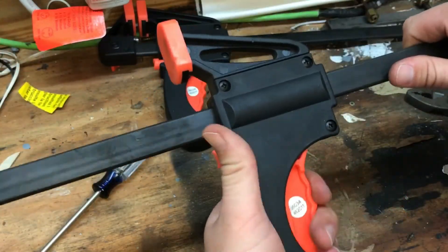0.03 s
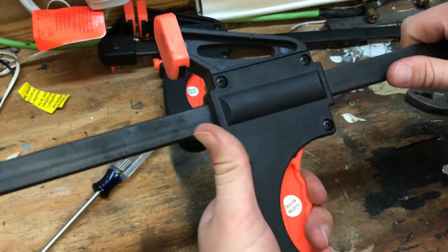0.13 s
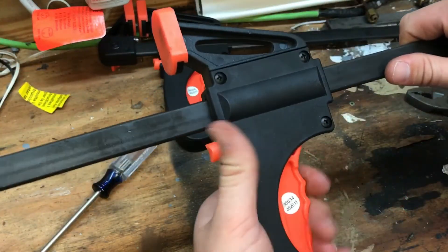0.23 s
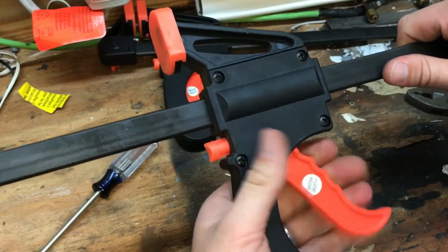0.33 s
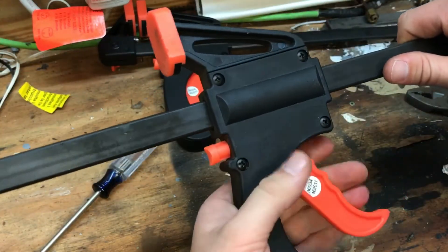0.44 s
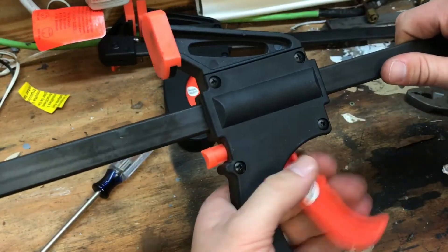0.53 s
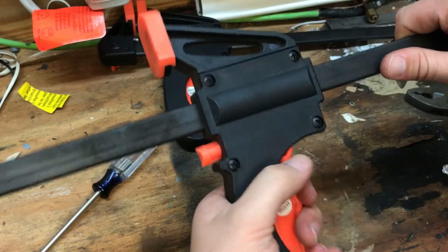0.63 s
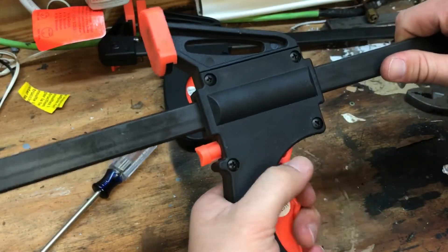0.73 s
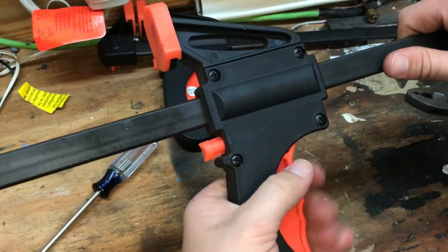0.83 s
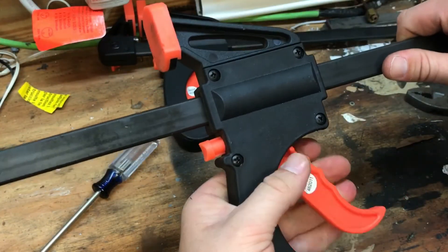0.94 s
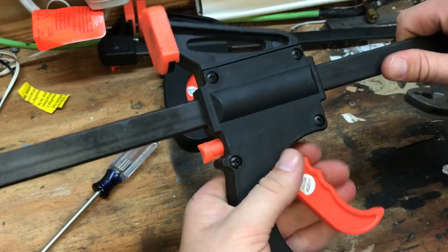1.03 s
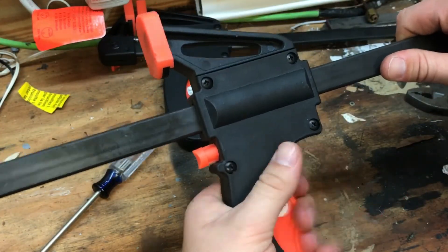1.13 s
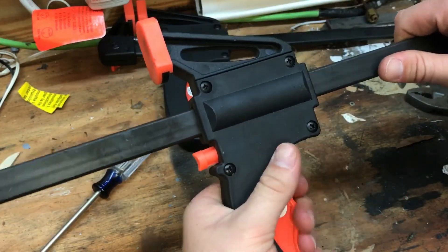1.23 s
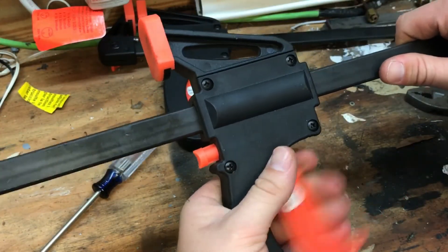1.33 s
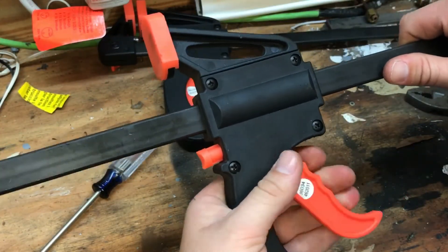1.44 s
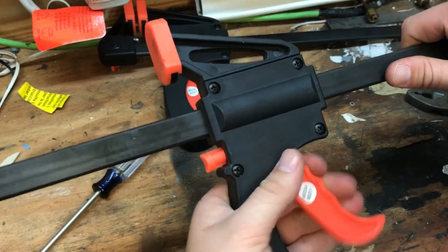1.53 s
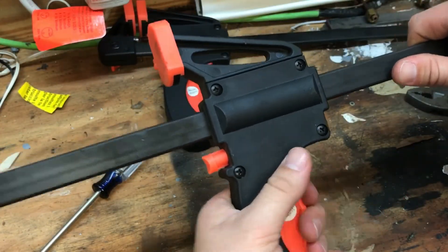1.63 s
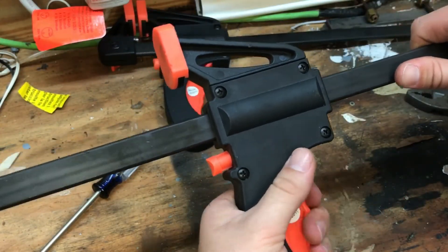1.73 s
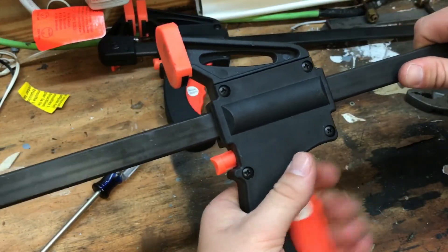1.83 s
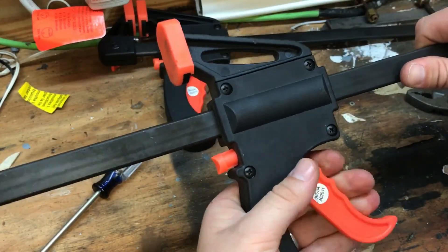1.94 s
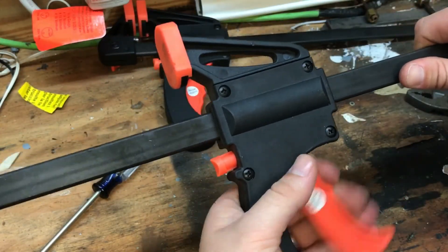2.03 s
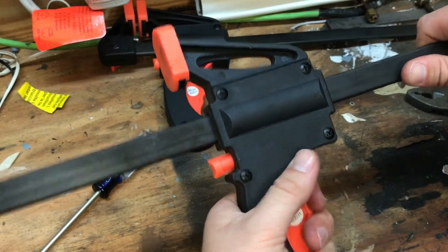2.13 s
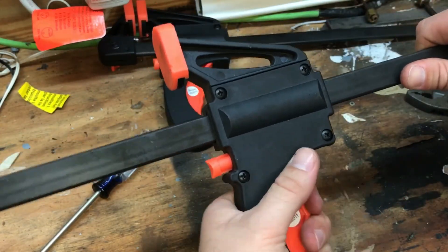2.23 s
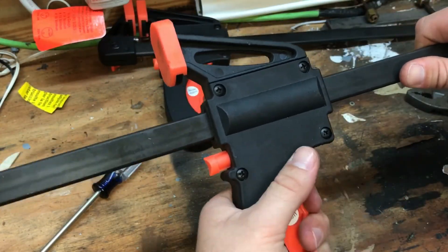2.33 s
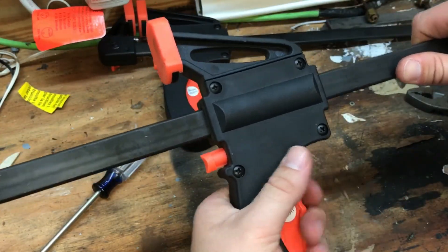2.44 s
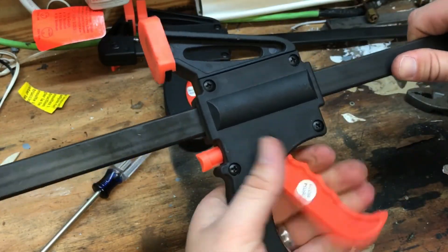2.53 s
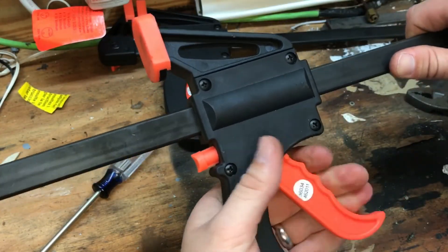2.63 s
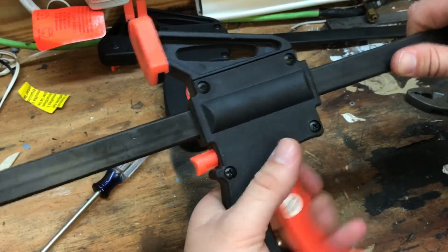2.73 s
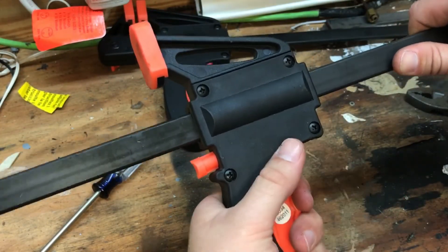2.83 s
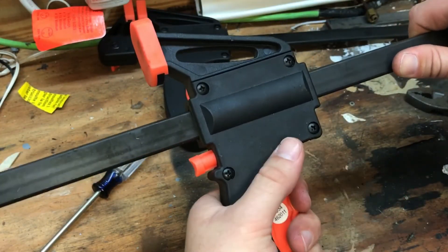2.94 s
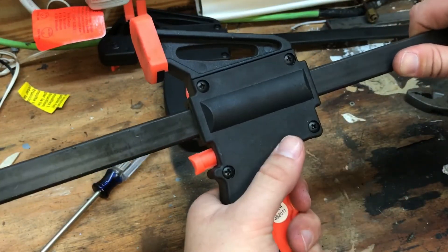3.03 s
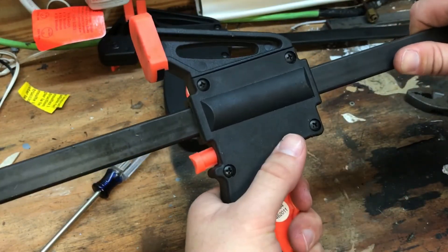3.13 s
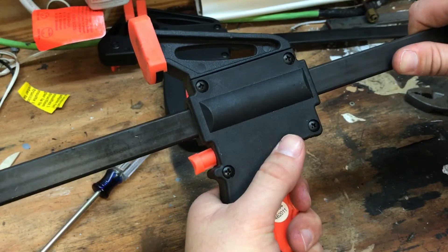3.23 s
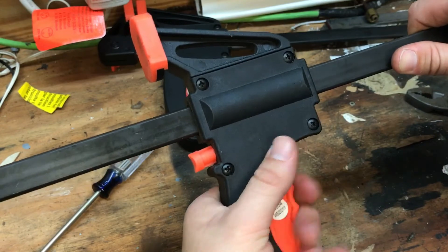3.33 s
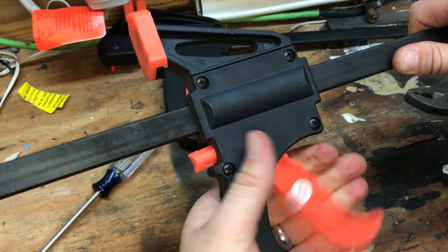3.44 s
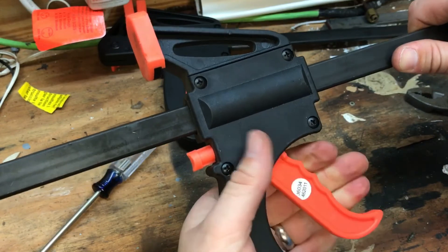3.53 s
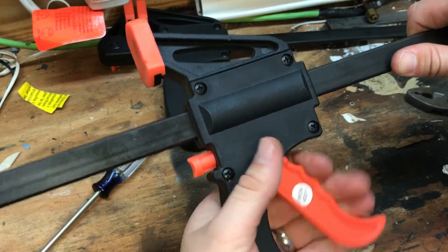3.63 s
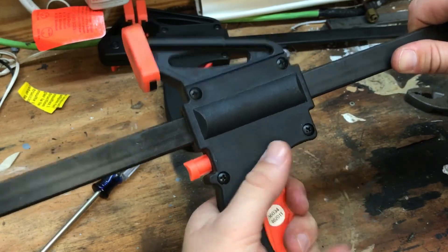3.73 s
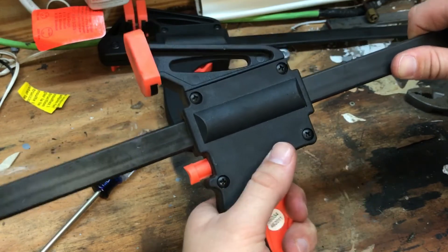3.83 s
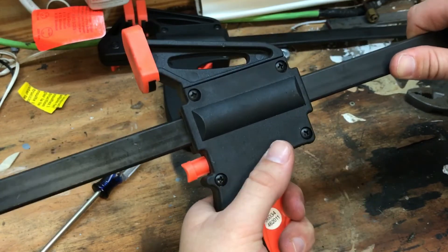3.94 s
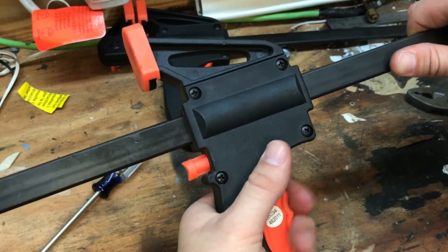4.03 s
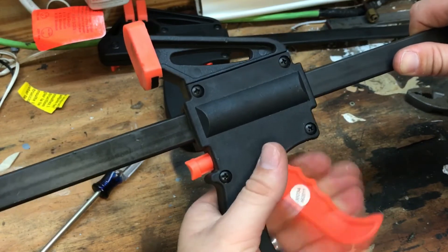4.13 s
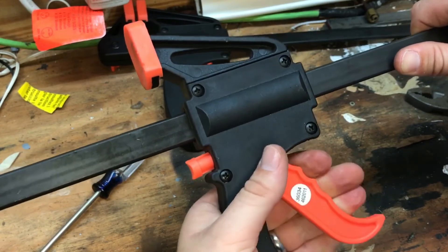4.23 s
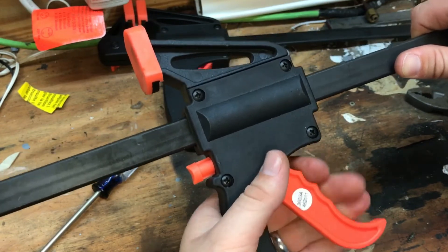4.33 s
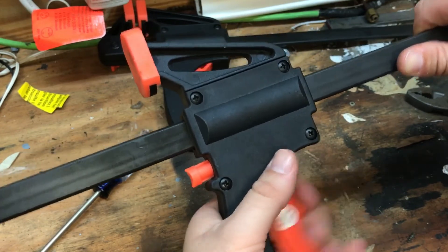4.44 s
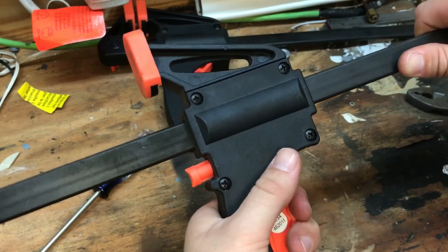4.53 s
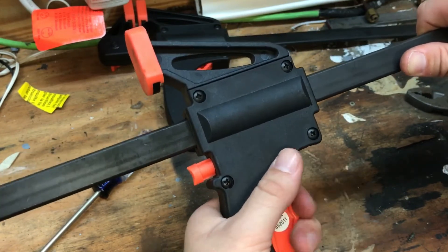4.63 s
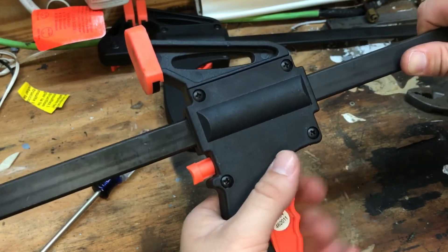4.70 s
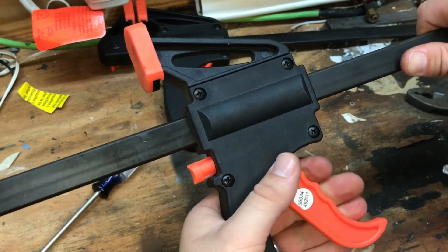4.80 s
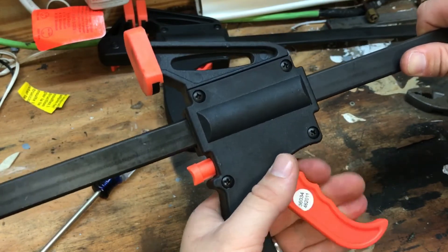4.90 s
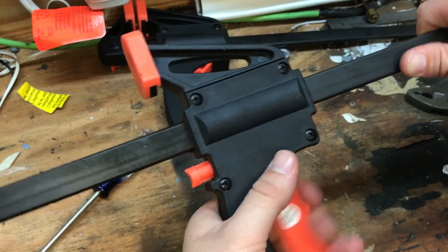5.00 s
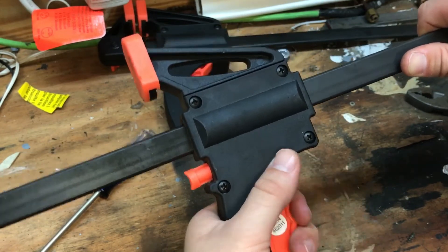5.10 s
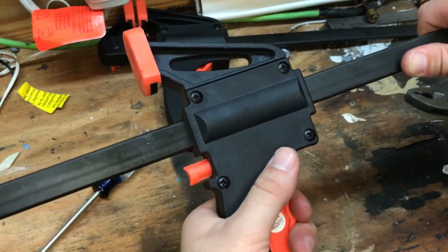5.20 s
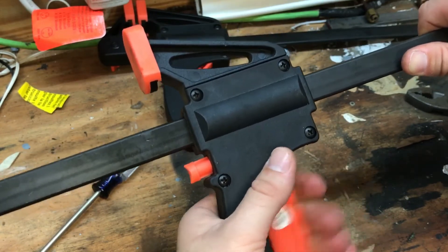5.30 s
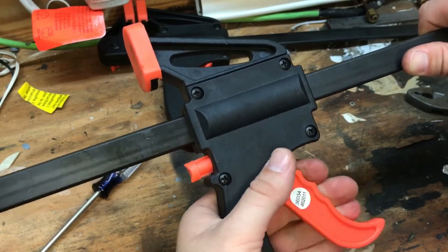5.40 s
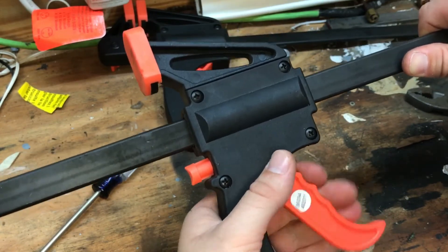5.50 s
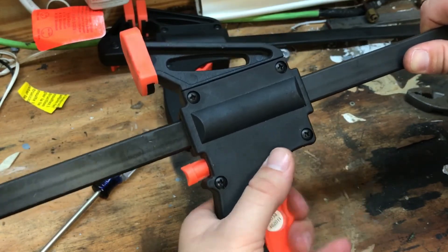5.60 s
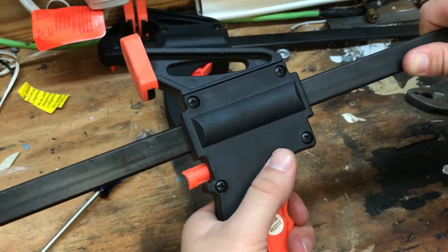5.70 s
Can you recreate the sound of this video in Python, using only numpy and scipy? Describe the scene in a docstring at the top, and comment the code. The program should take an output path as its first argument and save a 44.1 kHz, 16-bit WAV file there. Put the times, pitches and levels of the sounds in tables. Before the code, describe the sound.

Over the faint rumble of a small workshop, a hand squeezes and releases the trigger of a plastic clamp, heard up close. Softer clicks, short scrapes and taps of the advancing steel bar alternate with louder, hollow snaps of the returning trigger, a little under two strokes a second. A slight spring ring follows the snaps, and a soft hiss trails the sharpest. After nine strokes, a tenth squeeze clicks shut.

```python
"""Over the rumble of a small, dry shop, a plastic bar clamp is pumped close by, above a workbench.
First a squeeze takes up the slack and scrapes the steel bar forward until the locking plate catches
with a pitched tap. Then the fingers relax, and the spring throws the trigger back against the hollow
housing with a sharp snap and a faint twang; hiss lingers after the sharpest snaps. Late in the nine
strokes a faint low tone comes and goes, and a tenth squeeze ends the scene."""
import sys
import numpy as np
from scipy import signal
from scipy.fft import rfft, irfft, next_fast_len
from scipy.io import wavfile
from scipy.ndimage import uniform_filter1d, minimum_filter1d

SR = 44100
rng = np.random.default_rng(int(sys.argv[2]) if len(sys.argv) > 2 else 0)


def unload_wav(signal):
    """Save mono or channel-first audio to the path in sys.argv[1] as 16-bit WAV at rate SR, clipped to [-1, 1]."""
    wavfile.write(
        sys.argv[1],
        SR,
        np.round(np.clip(np.atleast_2d(signal).T, -1, 1) * 32767).astype(np.int16),
    )


N = 254057
TIME = np.arange(N) / SR
HIT_TIME = np.arange(4096) / SR  # seconds within one impact

# Impacts of the trigger on its stop. Each row: start in seconds, level, treble and bass in dB, chatter
# in seconds, favoured resonance in Hz, its relative level in dB, spring twang in dB.
TRIGGER_SNAPS = [(0.4135, -18.5, -4, -2.5, 0.0012, 1505, -16, -60.5),
                 (0.9859, -13, 5, -0.5, 0.0039, 2156, -1.5, -61.5),
                 (1.437, -16, 3, -1, 0.0021, 3660, -4, -57),
                 (1.9545, -21.5, -0.5, -1.5, 0.003, 1236, 0, -65),
                 (2.6161, -22, -7, 0, 0.0048, 1059, -11.5, -72),
                 (3.5148, -13.5, 8, -3.5, 0.0045, 1943, -5.5, -64),
                 (3.5285, -13.5, 5.5, -0.5, .002, 2160, -3, -77.5),
                 (4.2171, -18, -4.5, -6.5, 0.0019, 1151, -7.5, -57.5),
                 (4.842, -17.5, 2, 1, 0.0021, 1114, -13.5, -58),
                 (5.4256, -24.5, -1, -4, 0.00094, 1254, -18, -67.5)]
# Return swings of the trigger. Each row: start and length in seconds, then the levels in dB of the
# scrape, the knock on leaving and the knock near the stop.
TRIGGER_SWINGS = [(0.381, 0.048, -49, -41, -34), (0.9606, 0.023, -48, -43, -36),
                  (1.3933, 0.05, -53, -42, -37.5), (1.913, 0.046, -52, -42.5, -39),
                  (2.581, 0.038, -49, -39, -38.5), (3.4952, .0305, -46, -47, -25),
                  (4.193, 0.021, -53, -50.5, -40), (4.814, 0.028, -47.5, -44.5, -33),
                  (5.386, .037, -52.5, -45, -35)]
# Modes of the hollow housing. Each row: frequency in Hz, relative level in dB, 60 dB decay in seconds.
HOUSING_MODES = [(569.3, -13.5, 0.05), (896, -7, 0.019), (1028, -4.5, 0.04), (1120, -12, 0.022),
                 (1274, 0.5, 0.048), (1296, 5, 0.0083), (1619.6, -0.5, 0.072), (1960, 1.5, 0.012),
                 (2270, -5, 0.035), (2346, -5.5, 0.035), (3300, 0.5, .022), (3600, -3.5, 0.0077),
                 (3890, 4, 0.012), (3995, -3, 0.021), (4438, -9, 0.015), (5340, -8, 0.022),
                 (6120, -0.5, 0.015), (6930, -5, 0.016), (7000, -8.5, 0.02)]
# Spectrum of plastic striking plastic. Each row: frequency in Hz, gain in dB.
CRACK_SPECTRUM = [(140, -29.5), (290, -14.5), (430, -14), (700, -8), (1050, 2), (2200, -2), (2900, -4),
                  (3900, -2.5), (5000, -8), (7100, -7.5), (10300, -16), (12300, -13), (15500, -24)]


def undb(db):
    """Amplitude grows tenfold for every 20 dB."""
    return 10 ** (np.asarray(db) / 20)


def unit(x):
    """Power normalisation: scale to rms 1."""
    return x / np.sqrt(np.mean(x ** 2))


def unit_blow(x):
    """Energy normalisation: scale a blow to the energy of 4 ms at rms 1."""
    return x / np.sqrt(np.sum(x ** 2) / (.004 * SR))


def add(out, start_s, x):
    """Superposition: x adds to out from its start time."""
    i = max(0, int(start_s * SR))
    out[i:i + len(x)] += x[:max(0, N - i)]


def colour(x, points):
    """A minimum-phase filter through (Hz, dB) points shapes the spectrum without pre-ringing."""
    size = 2 * next_fast_len(len(x))
    hz, db = np.transpose(points)
    bin_hz = np.arange(size // 2 + 1) * SR / size
    gain_db = np.interp(np.log(bin_hz + 1), np.log(hz), db)
    cepstrum = irfft(np.log(undb(gain_db)))
    cepstrum[1:size // 2] *= 2
    cepstrum[size // 2 + 1:] = 0
    return irfft(rfft(x, size) * np.exp(rfft(cepstrum)))[:len(x)]


def whiten(x, width_hz=350):
    """Spectral whitening levels the broad humps of a random burst and leaves its fine grain."""
    power = uniform_filter1d(np.abs(rfft(x)) ** 2, max(1, int(width_hz * len(x) / SR)))
    hz = np.arange(len(power)) * SR / len(x) + 1
    return colour(x, np.column_stack([hz, -10 * np.log10(np.abs(power) + 1e-12)]))


def hardness(x, treble_db, bass_db):
    """Contact stiffness and mass tilt the spectrum: hard blows are brighter, heavy ones fuller."""
    treble = [(4000, treble_db * 0.42), (8000, treble_db * 0.65), (12000, treble_db)]
    return colour(x, [(550, bass_db), (1400, 0)] + treble)


def ring(modes, t, scatter_db, detune=0.011):
    """Free vibration is a sum of damped modes; each blow lands elsewhere and weights them anew."""
    out = 0
    for k, (hz, db, t60) in enumerate(modes):
        amplitude = (-1) ** k * undb(db + scatter_db * rng.standard_normal())
        mode_hz = hz * (1 + detune * rng.standard_normal())
        out += amplitude * np.exp(-np.log(1000) * t / t60) * np.sin(2 * np.pi * mode_hz * t)
    return out


def background(rumble_db=-56, tone_db=-63, tone_start_s=4.32, tone_end_s=5.046):
    """Broadband noise gives the shop's rumble and hiss; a faint, frequency-modulated tone passes."""
    # Ambient spectrum. Each row: frequency in Hz, gain in dB.
    shop_spectrum = [(20, -34.5), (32, -15.5), (42, -2), (66, 0), (85, -5), (112, -1), (150, -14.5),
                     (300, -20), (500, -28.5), (1000, -34.5), (3000, -43), (8000, -49), (16000, -48)]
    # Partials of the tone. Each row: frequency in Hz, relative level in dB.
    partials = [(317.6, 7.5), (387.6, 3.5), (635, -4.5), (775, -11)]
    rumble = undb(rumble_db) * unit(colour(rng.standard_normal(N), shop_spectrum))
    drift = unit(uniform_filter1d(rng.standard_normal(N), SR // 10))
    wavering_time = TIME + 0.01 * np.cumsum(drift) / SR  # pitch wavers by 1 % rms
    tone = unit(sum(undb(db) * np.sin(2 * np.pi * hz * wavering_time) for hz, db in partials))
    rise, fall = (TIME - tone_start_s) / 0.035, (tone_end_s - TIME) / 0.11
    return rumble + undb(tone_db) * np.clip(np.minimum(rise, fall), 0, 1) * tone


def gated_hiss(x, hiss_db=-69, threshold_db=-34, knee_db=.5, hold_s=.41):
    """A noise gate opens on loud treble in x and lets the recorder's hiss through for a moment."""
    # Spectrum of the hiss. Each row: frequency in Hz, gain in dB.
    hiss_spectrum = [(200, -10), (1500, 3), (4000, 2), (7000, -0.5), (11000, -3), (16000, -8.5)]
    treble = signal.sosfilt(signal.butter(4, [8000, 15000], "band", fs=SR, output="sos"), x)
    level_db = 10 * np.log10(np.abs(uniform_filter1d(treble ** 2, SR // 100)) + 1e-12)
    hold = int(hold_s * SR)
    held_db = -minimum_filter1d(-level_db, hold, origin=(hold - 1) // 2)  # the recent maximum
    opening = .5 + .5 * np.tanh((held_db - threshold_db) / knee_db)
    return undb(hiss_db) * unit(colour(rng.standard_normal(N), hiss_spectrum)) * opening


def echoes(early_db=-14, early_s=0.01, tail_db=-16):
    """Impulse response: bench and tools scatter early reflections, the walls add a diffuse tail."""
    # Reverberation. Each row: frequency in Hz, relative level in dB, 60 dB decay in seconds.
    reverberation = [(200, -5, 0.84), (610, 0.5, 0.28), (1309, 0.5, 0.2), (2200, 1.5, 0.24),
                     (4150, -1.5, 0.25), (7500, 2, 0.2), (12030, 3, 0.15), (16100, 9, 0.14)]
    hz, db, t60 = np.transpose(reverberation)
    t = TIME[:SR // 3]
    edges_hz = np.geomspace(100, 18000, 13)
    noise, bin_hz = rfft(rng.standard_normal(len(t))), np.fft.rfftfreq(len(t), 1 / SR)
    tail = 0
    for low, high in zip(edges_hz, edges_hz[1:]):
        band = irfft(noise * (bin_hz >= low) * (bin_hz < high), len(t))
        log_centre = np.log(low * high) / 2
        gain = undb(np.interp(log_centre, np.log(hz), db))
        decay_s = np.interp(log_centre, np.log(hz), t60)
        tail += band * gain * np.exp(-np.log(1000) * t / decay_s)
    tail *= np.clip((t - .006) / 0.012, 0, 1)
    scatter = rng.standard_normal(len(t)) * (t > .003) * np.exp(-t / early_s)
    early = colour(scatter, [(300, -2), (1500, 0), (5000, -3.5), (14000, -3.5)])
    return undb(early_db) * early / np.linalg.norm(early) + undb(tail_db) * tail / np.linalg.norm(tail)


def room(x, positions=20):
    """Reflections depend on source position: the clamp sways, so each stroke meets other echoes."""
    out = x.copy()
    for part in np.array_split(np.arange(N), positions):
        add(out, part[0] / SR, signal.fftconvolve(x[part], echoes()))
    return out


def hand(rub_db=-68, flutter_db=5, lead_s=.03, width_s=0.029):
    """Sliding friction of skin on plastic hisses unevenly as the fingers open for each release."""
    # Spectrum of the rubbing skin. Each row: frequency in Hz, gain in dB.
    skin_spectrum = [(200, -15), (1500, 10.5), (4000, 1), (7000, 1.5), (11000, -4), (16000, -10.5)]
    opening = sum(np.exp(-((TIME - start + lead_s) / width_s) ** 2) for start, *_ in TRIGGER_SWINGS)
    flutter = unit(uniform_filter1d(rng.standard_normal(N), SR // 70))
    rub = unit(colour(rng.standard_normal(N), skin_spectrum))
    return rub * opening * undb(rub_db + flutter_db * flutter)


def spring():
    """Light damping lets the return spring and the steel bar ring on faintly after a snap."""
    # Modes of spring and bar. Each row: frequency in Hz, relative level in dB, 60 dB decay in seconds.
    steel_modes = [(890, 4, 1), (780, -9.5, .5), (1360, 3.5, 0.19), (1980, 8, 0.33), (2340, 2.5, .24),
                   (4322, 2.5, 0.091), (4443, -0.5, 0.14)]
    out = np.zeros(N)
    for start, *_, twang_db in TRIGGER_SNAPS:
        add(out, start, undb(twang_db) * ring(steel_modes, TIME[:SR], scatter_db=1, detune=0.001))
    return out


def tick(db, fade_s=.0015):
    """A brief contact has a broad spectrum: a tiny, bright burst of noise."""
    # Spectrum of the contact. Each row: frequency in Hz, gain in dB.
    tick_spectrum = [(400, -19), (1100, -10), (1550, 6), (2200, -4.5), (5000, -3), (7000, 3.5),
                     (9500, -7.5), (13000, -5.5), (16000, -7)]
    burst = whiten(rng.standard_normal(len(HIT_TIME)) * np.exp(-HIT_TIME / fade_s))
    return undb(db) * unit_blow(colour(burst, tick_spectrum))


def crack(chatter_s, fade_s):
    """The faces chatter briefly, then dense, overlapping plastic modes decay as noise."""
    envelope = np.exp(-np.maximum(HIT_TIME - chatter_s, 0) / fade_s) * (1 - np.exp(-HIT_TIME / 0.00015))
    burst = whiten(rng.standard_normal(len(HIT_TIME)) * envelope)
    return unit_blow(colour(burst, CRACK_SPECTRUM))


def knock(db, treble_db, bass_db):
    """The light impact of a slack part excites the modes of the housing."""
    contact = crack(chatter_s=.002, fade_s=0.0031)
    shell = unit_blow(ring(HOUSING_MODES, HIT_TIME, scatter_db=3.5))
    return undb(db) * unit_blow(hardness(contact + undb(-3.5) * shell, treble_db, bass_db))


def plate_tap(db, treble_db):
    """The locking plate drops onto the bar; its modes give a pitch that the grip soon damps."""
    # Modes of the plate. Each row: frequency in Hz, relative level in dB, 60 dB decay in seconds.
    plate_modes = [(340, -19, .025), (593, -14, 0.037), (875, -16.5, 0.066), (1232, -12.5, 0.056),
                   (1525, 4, 0.024), (2070, -11.5, 0.018), (2610, -15.5, 0.062), (3170, -5, 0.034),
                   (3660, -8.5, 0.0059), (4270, -16.5, 0.029)]
    damping = np.exp(-(HIT_TIME / 0.015) ** 2)
    attack = 1 - np.exp(-HIT_TIME / 0.00018)
    tap = unit_blow(ring(plate_modes, HIT_TIME, scatter_db=2.5) * damping) * attack
    contact = undb(-17) * crack(chatter_s=0.0011, fade_s=0.0028)
    return undb(db) * unit_blow(hardness(tap + contact, treble_db, bass_db=-0.53))


def loose_parts():
    """Play in the mechanism allows small impacts: the parts tick, knock and settle."""
    # Ticks as the fingers relax before a release. Each row: start in seconds, level in dB.
    ticks = [(0.264, -56), (.889, -57.5), (1.858, -61), (2.5258, -53.5), (3.4407, -55), (4.1336, -58),
             (4.747, -56.5), (5.322, -56.5)]
    # Stray knocks of the loose trigger. Each row: start in seconds, level in dB, treble in dB.
    stray_knocks = [(.381, -37, -1.5), (0.9751, -30, -2), (2.8425, -39.5, -3.5), (3.383, -54.5, -4.5),
                    (3.7348, -45, 8), (4.2087, -28, 5.5), (4.2236, -34.5, -3)]
    # Dull taps of the settling plate. Each row: start in seconds, level in dB.
    settling_taps = [(0.7087, -45.5), (2.225, -51.5), (2.8661, -44), (3.8352, -48), (4.574, -49),
                     (5.143, -49)]
    out = np.zeros(N)
    for start, db in ticks:
        add(out, start, tick(db))
    for start, db, treble_db in stray_knocks:
        add(out, start, knock(db, treble_db, bass_db=7))
    for start, db in settling_taps:
        add(out, start, plate_tap(db, treble_db=-23))
    return out


def friction(length_s, treble_db, spectrum, slips_per_s, spread_db, onset_s):
    """Stick-slip friction: random impulses grow as the parts gather speed; rms 1 while they last."""
    size = 2 * len(HIT_TIME)
    t = np.arange(size) / SR
    slips = (rng.random(size) < slips_per_s / SR) * rng.choice([-1, 1], size)
    strength = undb(spread_db * rng.standard_normal(size))
    envelope = (t < length_s) * (1 - np.exp(-t / onset_s))
    rasp = hardness(colour(slips * strength * envelope, spectrum), treble_db, bass_db=-1.5)
    return unit(rasp) * np.sqrt(length_s / t[-1])


def squeezes(scrape_db=-61.5):
    """By friction the drive plate grips and pushes the bar; the locking plate catches, judders, seats."""
    # Each row: start in seconds, slack knock in dB, grip delay in seconds, grip level and treble in dB,
    # catch delay in seconds, catch level and treble in dB.
    strokes = [(.0, -47, 0.056, -44.5, 4.5, .0871, -51.5, -35),
               (.6132, -55, 0.029, -35.5, 6.5, 0.064, -42.5, 1),
               (1.1368, -50, 0.03, -35, 3.5, 0.06, -29.5, -7),
               (1.6224, -53.5, 0.032, -36.5, 7, 0.064, -28.5, -9.5),
               (2.1015, -51, 0.032, -35, 4, 0.069, -31.5, -6.5),
               (2.7619, -51.5, 0.028, -37.5, -3, 0.059, -43, -2.5),
               (3.7182, -60, 0.037, -40, 4, 0.081, -36, -25.5),
               (4.44, -57, 0.027, -42, -4.5, .0731, -32.5, -7),
               (5.022, -48.5, 0.031, -43.5, -8, 0.069, -25.5, -9.5),
               (5.5951, -42, 0.03, -37.5, -4, 0.067, -26, -7.5)]
    # Spectrum of the plate's rasping edge. Each row: frequency in Hz, gain in dB.
    edge_spectrum = [(300, -12.5), (800, -6.5), (1550, 0.5), (2400, -7.5), (3300, 0.5), (3750, -2),
                     (4400, 1), (5300, -9.5), (6800, -3.5), (7600, -18), (8500, -4.5), (11000, -16.5),
                     (15500, -16)]
    touch_lead_s, judder_delay_s, seat_delay_s = .0066, .0055, .016
    out = np.zeros(N)
    for start, slack_db, grip_s, grip_db, grip_treble_db, catch_s, catch_db, catch_treble_db in strokes:
        scrape = friction(catch_s, treble_db=0.5, spectrum=CRACK_SPECTRUM,
                          slips_per_s=1600, spread_db=6.5, onset_s=0.007)
        judder = friction(length_s=.014, treble_db=catch_treble_db + 2, spectrum=edge_spectrum,
                          slips_per_s=3700, spread_db=0.5, onset_s=0.0015)
        grip_at, catch_at = start + grip_s, start + catch_s
        add(out, start, knock(slack_db, treble_db=-4.5, bass_db=-12))
        add(out, start, undb(scrape_db) * scrape)
        # The plate's edge touches first, then its grip loads the whole housing.
        add(out, grip_at - touch_lead_s, knock(grip_db - 7, grip_treble_db + 2, bass_db=-9.5))
        add(out, grip_at, knock(grip_db, grip_treble_db, bass_db=11.5))
        add(out, catch_at, plate_tap(catch_db, catch_treble_db))
        add(out, catch_at + judder_delay_s, undb(catch_db - 12.5) * judder)
        add(out, catch_at + seat_delay_s, plate_tap(catch_db - 11, catch_treble_db))
    return out


def releases(slip_lead_s=0.0097, knock_lead_s=.0155):
    """The spring's restoring force swings the trigger back with a scrape and two knocks."""
    out = np.zeros(N)
    for start, length_s, scrape_db, leave_db, near_stop_db in TRIGGER_SWINGS:
        scrape = friction(length_s + slip_lead_s, treble_db=1.5, spectrum=CRACK_SPECTRUM,
                          slips_per_s=1300, spread_db=3.5, onset_s=0.018)
        # The bar slips, the trigger leaves, and the drive plate knocks near the end of the swing.
        add(out, start - slip_lead_s, undb(scrape_db) * scrape)
        add(out, start, knock(leave_db, treble_db=-3.5, bass_db=8.5))
        add(out, start + length_s - knock_lead_s, knock(near_stop_db, treble_db=-13, bass_db=-2))
    return out


def snaps():
    """Impact excitation: the trigger slams into its stop and the hollow housing resonates."""
    out = np.zeros(N)
    # The shell fills with vibration, then the hand damps it.
    swell = (1 - np.exp(-HIT_TIME / 0.0036)) * np.exp(-(HIT_TIME / 0.0081) ** 2)
    for start, db, treble_db, bass_db, chatter_s, favoured_hz, favoured_db, _ in TRIGGER_SNAPS:
        shell = unit_blow(ring(HOUSING_MODES, HIT_TIME, scatter_db=5.5) * swell)
        favoured = unit_blow(ring([(favoured_hz, 0, .028)], HIT_TIME, scatter_db=0) * swell)
        blow = hardness(crack(chatter_s, fade_s=0.0038) + undb(-2) * shell, treble_db, bass_db)
        add(out, start, undb(db) * unit_blow(blow + undb(favoured_db) * favoured))
    return out


def scene():
    """The clamp, its echoes and the background superpose in one channel."""
    clamp = snaps() + releases() + squeezes() + loose_parts()
    return (room(clamp) + spring() + hand() + background())[None]


def record(dry, cutoff_hz=15900):
    """Band limiting: the recorder adds its gated hiss, then a steep low-pass cuts the top."""
    low_pass = signal.ellip(10, .2, 70, cutoff_hz, fs=SR, output="sos")
    return signal.sosfilt(low_pass, dry + gated_hiss(dry[0]))


dry = scene()
out = record(dry)
unload_wav(out)
```